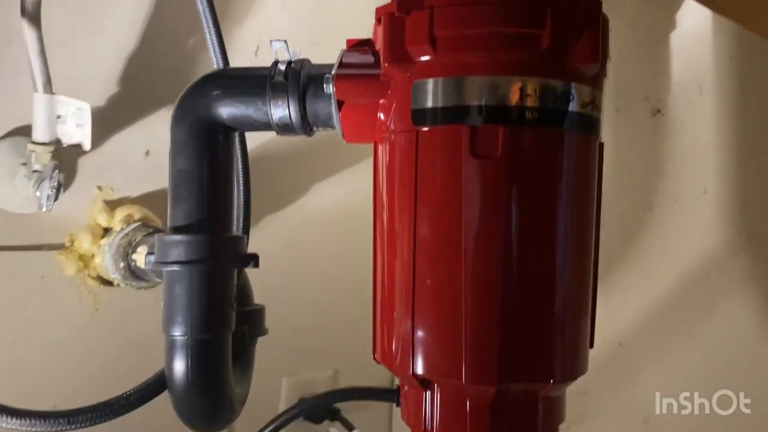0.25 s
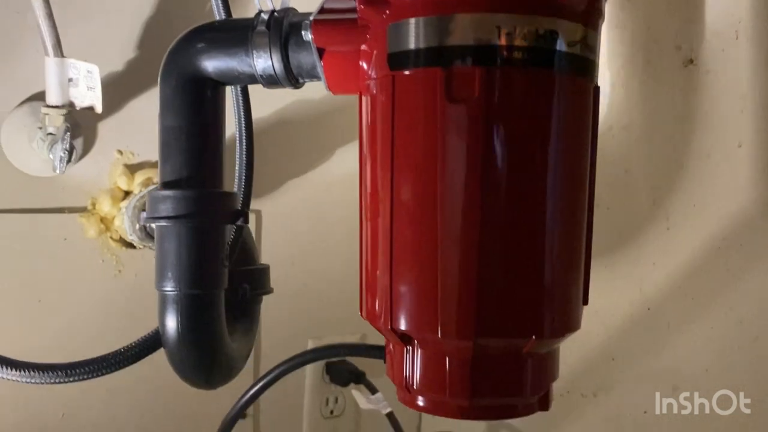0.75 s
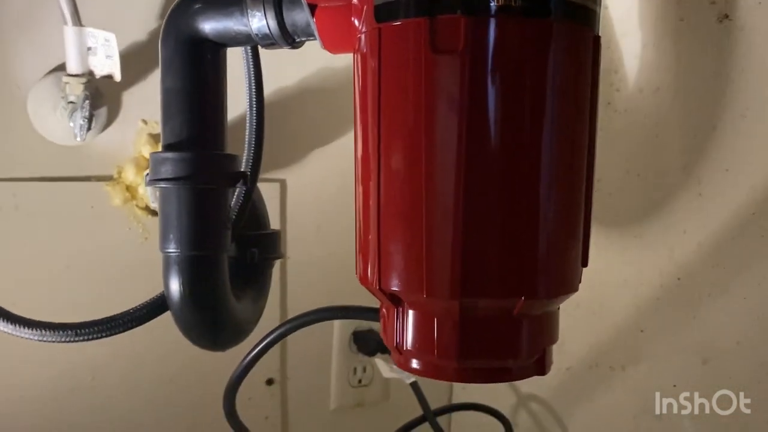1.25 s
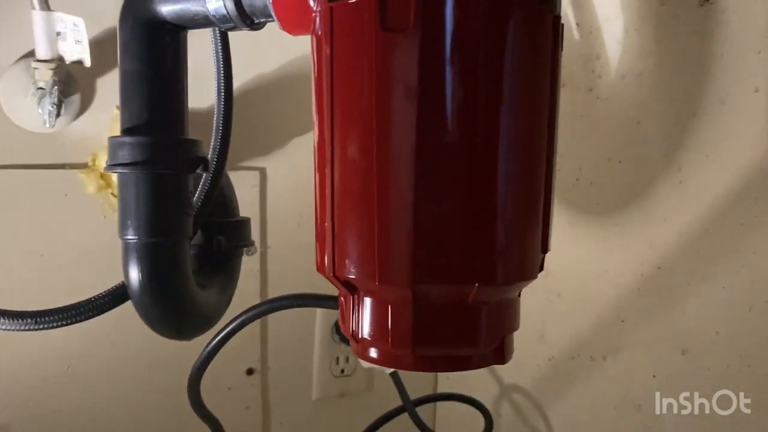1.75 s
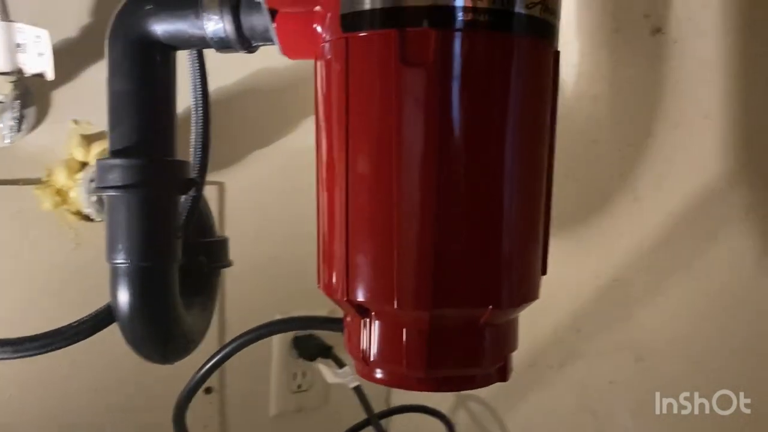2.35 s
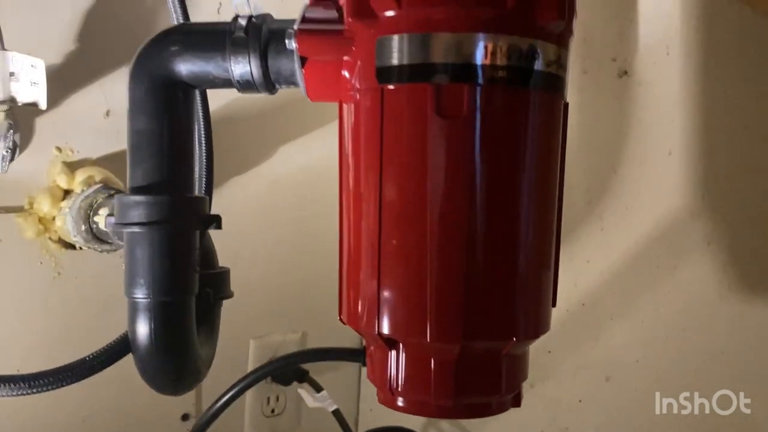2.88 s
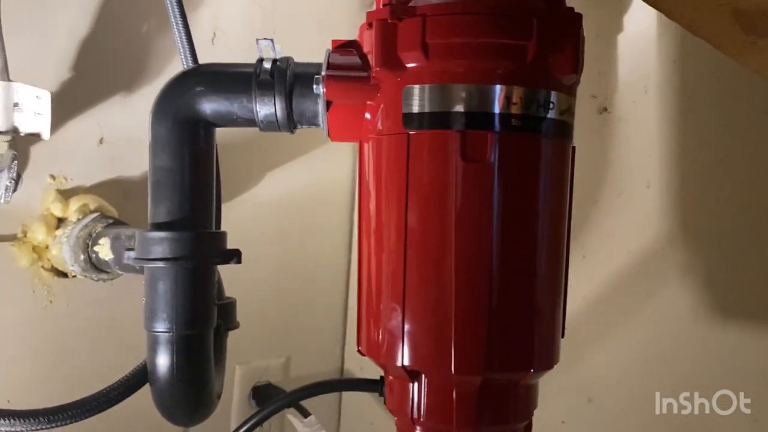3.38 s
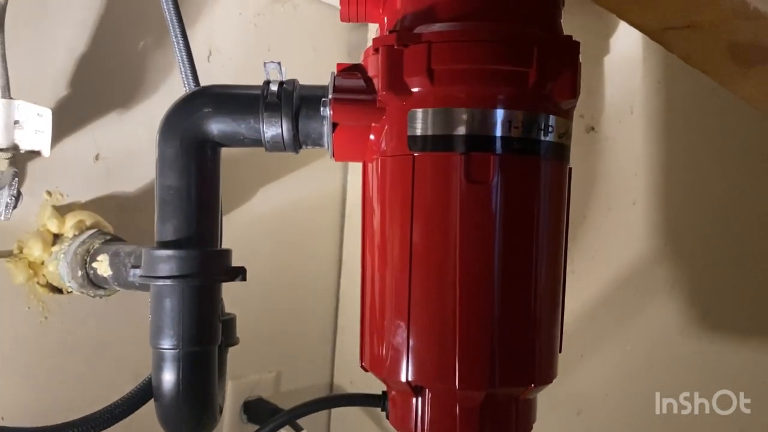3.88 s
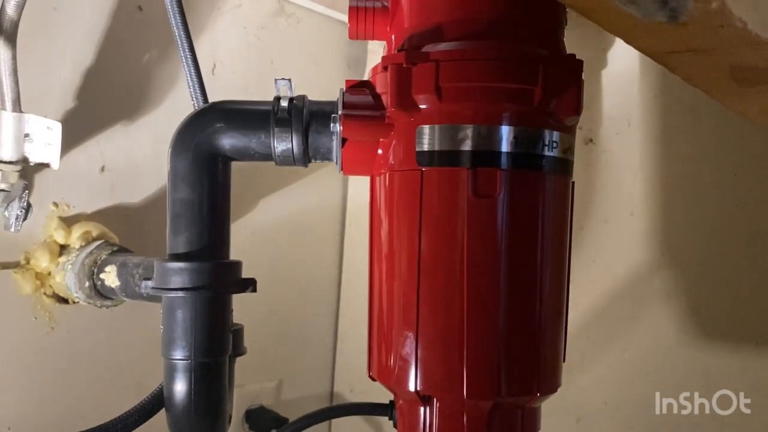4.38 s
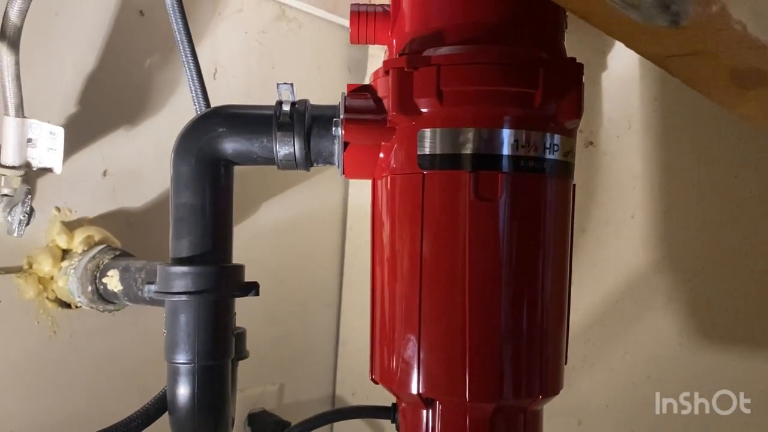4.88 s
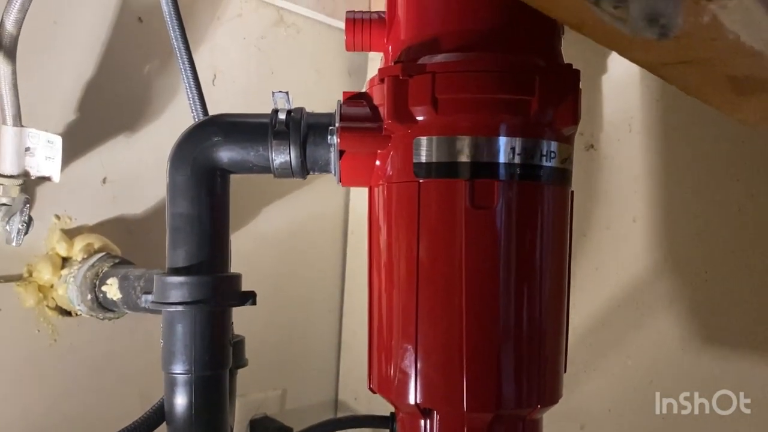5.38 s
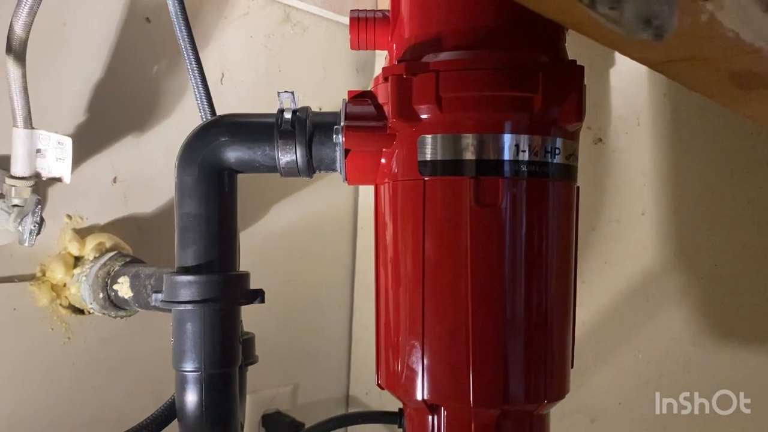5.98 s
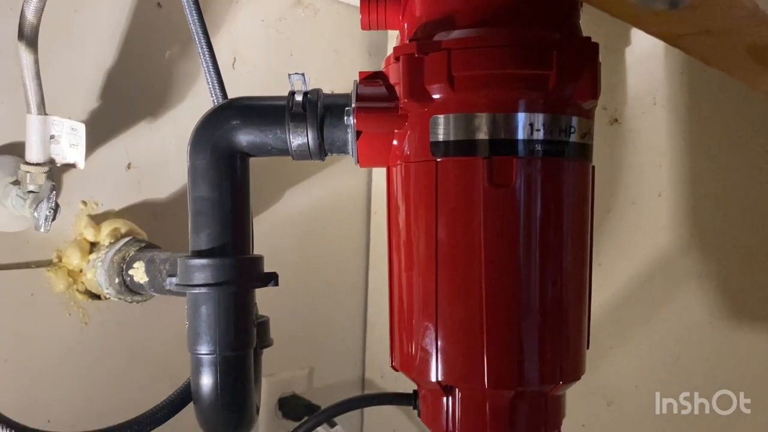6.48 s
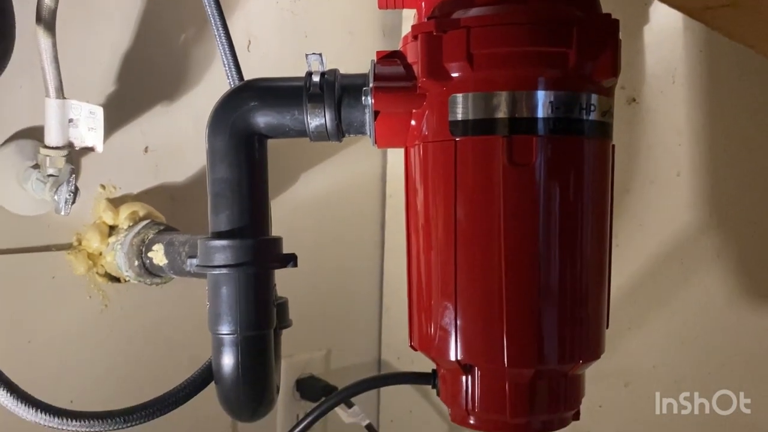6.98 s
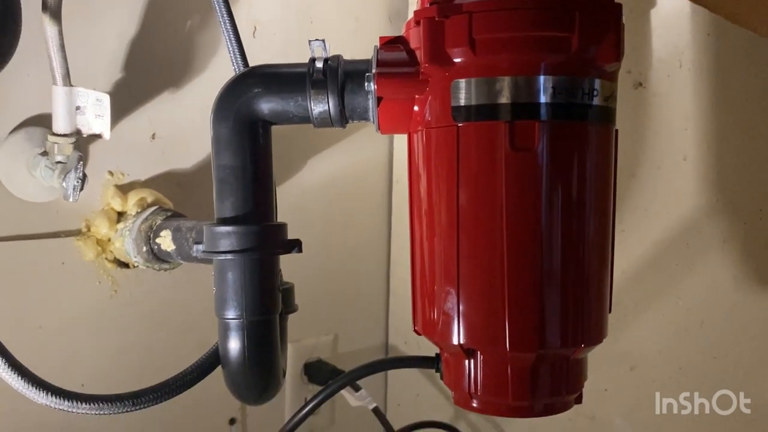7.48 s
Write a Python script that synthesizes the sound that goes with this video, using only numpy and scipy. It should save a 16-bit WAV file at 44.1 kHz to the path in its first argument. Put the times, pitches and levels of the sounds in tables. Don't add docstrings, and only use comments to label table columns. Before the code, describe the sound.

Close inside a kitchen sink cabinet, a waste grinder is already running at 0 s and continues unbroken to about 7.7 s, with nothing solid being ground. A low hum near 120 Hz beats several times a second against the shaft tone, under a stack of buzzing mid tones and a thin commutator whine around 750 and 1500 Hz. Brushes scrape in a dry, fast rasp. Water hisses broadly, churns and rings in the steel chamber, and gurgles in the trap, notably around 0.6 and 2 s. The whine is damped near 0.3 s, freer and brighter near 1.2 s, and duller again at 3 s. Soft low water thumps come irregularly, stronger near 2.5, 4.1, 5.2, 5.9 and 6.5 s. The hand-held stereo microphones wander, making tones swell and fade, with short boxy reflections and slightly muted extreme treble.

```python
import sys
import numpy as np
from scipy import signal
from scipy.fft import rfft, irfft, next_fast_len
from scipy.io import wavfile

SR = 44100
rng = np.random.default_rng(int(sys.argv[2]) if len(sys.argv) > 2 else 0)


def pcm_store(signal):
    levels = np.round(np.clip(np.atleast_2d(signal), -1, 1) * 32767)
    wavfile.write(sys.argv[1], SR, levels.astype(np.int16).T)


def nominal_scale(level):
    x = np.asarray(level, float) / 20
    return 10 ** x


N = 341334
FFT_SIZE = next_fast_len(N)
HZ = np.maximum(np.fft.rfftfreq(FFT_SIZE, 1 / SR), 1)
STEP = 64
SLOW_S = np.arange(N // STEP + 2) * STEP / SR
RIPPLE_HZ = 119.92

# (time [s], sideways [-1..1], depth [-1..1], height [-1..1])
HAND_PATH = [(0.0, 0.28, 0.68, -1.0), (0.5, 0.54, 0.19, -0.61), (1.0, 0.51, -0.51, -0.42),
             (1.5, 0.51, -0.63, 0.26), (2.0, 0.41, -0.99, 0.55), (2.5, 0.15, -0.06, 0.42),
             (3.0, 0.14, 0.64, -0.19), (3.5, 0.043, 0.4, 0.3), (4.0, -0.097, 0.32, 0.71),
             (4.5, -0.014, 0.56, 0.23), (5.0, -0.73, -0.031, 0.2), (5.5, -0.44, -0.5, -0.77),
             (6.0, -0.79, -0.83, -0.27), (6.5, -0.63, -1, -0.2), (7.0, -0.41, -0.56, -0.15),
             (7.74, -0.6, -0.71, 0.76)]


def rms_one(x):
    return x / np.sqrt(np.mean(x ** 2) + 1e-20)


def in_time(rows):
    s, *columns = np.transpose(rows)
    return [np.interp(SLOW_S, s, c) for c in columns]


def full(slow):
    return np.interp(np.arange(N) / SR, SLOW_S, slow)


def at_hz(points, hz, axis=1):
    points = np.array(points)
    return np.interp(np.log(hz), np.log(points[:, 0]), points[:, axis])


def filtered(x, gain):
    return irfft(rfft(x, FFT_SIZE) * gain, FFT_SIZE)[:, :N]


def drift(rate):
    r = np.exp(-2 * np.pi * rate * STEP / SR)
    noise = rng.standard_normal(len(SLOW_S) + 2000)
    slow = signal.lfilter([1], [1, -2 * r, r * r], noise)[2000:]
    return rms_one(slow - slow.mean())


def resonate(x, modes):
    out = 0
    for hz, width, level_db in modes:
        r = np.exp(-np.pi * width / SR)
        b, a = [1, 0, -1], [1, -2 * r * np.cos(2 * np.pi * hz / SR), r * r]
        rung = signal.lfilter(b, a, signal.lfilter(b, a, x))
        out = out + nominal_scale(level_db) * rms_one(rung)
    return rms_one(out)


def rotation():
    # (time [s], speed [turns per s])
    spin = [(0.0, 62.503), (0.5, 62.57), (0.9, 62.618), (1.2, 62.737), (1.6, 62.688), (1.9, 62.547),
            (2.3, 62.589), (2.8, 62.643), (3.3, 62.605), (3.7, 62.501), (4.2, 62.611), (4.7, 62.281),
            (5.2, 62.396), (5.8, 62.463), (6.2, 62.459), (6.6, 62.533), (7.2, 62.482), (7.74, 62.447)]
    shaft = 0.128 + np.cumsum(full(in_time(spin)[0])) / SR
    ripple = -0.455 + RIPPLE_HZ * np.arange(N) / SR
    return shaft, ripple


def tone(turns, level_db, pan_db, lead):
    size = np.sqrt(2) * full(nominal_scale(level_db))
    sides = []
    for sign in (.5, -.5):
        angle = np.float32(2 * np.pi * (turns % 1) + sign * lead)
        sides.append(nominal_scale(sign * pan_db) * size * np.cos(angle))
    return np.array(sides)


def hum(shaft, ripple):
    # (time [s], mains hum [dB], second shaft order [dB])
    throb = [(0, -26, -33.5), (2, -25.5, -34), (4, -25.5, -32), (6, -25.5, -31.5), (7.74, -25.5, -33)]
    hum_db, second_db = in_time(throb)
    mains = tone(ripple, hum_db + .3 * drift(1.5), 2.3, .2)
    second = tone(2 * shaft, second_db + .5 * drift(1.5), 3.0, .4)
    return mains + second


def whine(shaft, ripple):
    # (shaft multiple, level [dB rms], then change [dB] per sideways, per depth, per height)
    shaft_orders = [(1, -46.1, -5.2, -1.0, 0.0), (3, -58.5, 4.1, 0.8, 0.1), (4, -40.8, 2.1, 2.1, 5.0),
                    (5, -43.1, -11.4, 2.5, -0.4), (6, -43.1, -4.7, 4.5, -1.0), (7, -50.7, -5.6, 3.6, 3.0),
                    (8, -45.3, 0.1, 2.1, -2.7), (9, -54.7, -4.8, 3.6, -0.0), (10, -50.9, 3.9, 4.2, -1.8),
                    (12, -54.3, -0.2, 1.6, -2.4), (14, -57.1, -1.9, -0.7, -0.3), (17, -55.2, 0.6, 0.1, 0.5),
                    (24, -37.9, 0.2, -1.2, 1.3), (28, -50.1, 4.3, -3.9, -0.1), (29, -53.8, -4.7, 1.1, 1.6),
                    (31, -54.7, 5.9, -2.0, 0.2), (32, -54.9, 1.6, -1.0, 0.9), (33, -57.9, -5.3, 3.7, -2.7),
                    (36, -46.3, 7.0, -1.5, 2.1), (48, -47.4, -2.5, -2.5, 2.8), (60, -55.5, -4.8, 2.1, -2.7),
                    (72, -58.5, 2.1, -1.9, 1.1), (96, -55.2, -1.0, -3.4, 2.5),
                    (120, -65.8, 0.8, -2.7, -2.4)]
    # (shaft multiple, ripple multiple, level [dB rms], change [dB] per sideways, per depth)
    side_tones = [(-2, 2, -52.7, -2.0, 5.4), (0, 3, -51.2, 2.7, -0.3), (2, 2, -50.1, 1.9, 5.1),
                  (4, 1, -46.6, 1.8, 5.2), (0, 6, -54.3, 2.2, -2.5), (12, 2, -53.0, -2.4, 0.0),
                  (24, -1, -55.3, 0.3, 2.7), (24, 1, -41.6, 2.8, -0.6), (24, 2, -51.5, 5.0, 0.5),
                  (0, 14, -58.9, 2.4, 0.5), (36, 1, -59.5, 0.0, 1.3), (60, -1, -61.0, 7.5, 0.0)]
    # (frequency [Hz], left minus right [dB], left lead [rad])
    tone_side = [(62, -.4, .3), (250, -1.1, 0), (312, 6.1, -.1), (500, 6.2, .7), (1050, 5, 0),
                 (1500, 2, .3), (1620, 1.3, -1.1), (3000, -.5, 1.2)]
    # (time [s], half width [s], level at the 48th shaft order
    # [dB])
    hushes = [
        (.3, .3, -6.5),
        (1.15, 0.34, 3),
        (2.45, 0.15, 1.5),
        (3.05, 0.23, -4.5),
    ]
    whine_step = 12

    hush_db = sum(db * np.exp(-((SLOW_S - s) / width) ** 2) for s, width, db in hushes)
    sideways, depth, height = in_time(HAND_PATH)
    shiver = shaft + 0.0009 * full(drift(18.0))
    rows = [(k, 0, *rest) for k, *rest in shaft_orders]
    rows += [(*row, 0) for row in side_tones]
    out = np.zeros((2, N))
    for k, m, level_db, sideways_db, depth_db, height_db in rows:
        hz = k * 62.503 + m * RIPPLE_HZ
        swell_db = sideways_db * sideways + depth_db * depth + height_db * height + 1.4 * drift(0.28)
        if k > whine_step and k % whine_step == 0:
            swell_db = swell_db + hush_db * np.log2(k / whine_step) / 2
        turns = k * shiver + m * ripple + rng.random()
        tone_db = level_db + 0.13 + swell_db + 0.5 * drift(15.0)
        out += tone(turns, tone_db, at_hz(tone_side, hz), at_hz(tone_side, hz, axis=2))
    return out


def brushes(shaft, ripple):
    size, out = 720, 0
    for track in rng.standard_normal((3, 2, size)):
        seen = [np.interp(shaft % 1 * size, np.arange(size), side, period=size) for side in track]
        out = out + np.array(seen) * full(nominal_scale(3.1 * drift(0.96)))
    scrape = rms_one(out * (1 + 0.39 * np.cos(2 * np.pi * ripple)))
    return signal.sosfilt(signal.butter(4, 2400, "high", fs=SR, output="sos"), scrape)


def churn(scrape):
    # (frequency [Hz], level [dB per Hz])
    rumble = [(25, -67), (40, -77), (60, -61.5), (85, -55.5), (102, -57.5), (145, -59.5), (190, -71),
              (225, -63.5), (270, -57.5), (330, -63.5), (450, -58.5), (600, -60.5), (800, -66), (1000, -64)]
    # (frequency [Hz], level [dB per Hz])
    spray = [(1000, -67.5), (1400, -69.5), (1900, -66.5), (2500, -68.5), (3300, -66), (4500, -68),
             (5000, -71.5), (5800, -72.5), (6600, -74.5), (8000, -74), (10000, -76.5), (12500, -80),
             (15000, -78.5), (15800, -82)]
    # (frequency [Hz], change per sideways [dB], per depth [dB])
    shade = [(150, -0.5, -0.5), (210, -8, 3), (290, 6, -5.5), (420, -4, 3.5), (600, 4, -1), (850, 0.5, 0),
             (990, -6, 3.5), (1400, 1, 2.7), (1900, 2, -2.5), (2600, 0.5, 0.4), (3400, 2, 1),
             (4400, 3.5, -0.9), (5470, 0.3, 0.2), (8000, 0.6, 0.05)]
    white = rfft(rng.standard_normal((2, N)) + nominal_scale(-10.5) * scrape, FFT_SIZE)
    level_db = np.where(HZ < 1000, at_hz(rumble, HZ), at_hz(spray, HZ))
    colored = white * np.sqrt(SR / 2) * nominal_scale(level_db)
    out, together, octaves = 0, drift(11.0), np.log2(HZ / 30)
    sideways, depth, _ = in_time(HAND_PATH)
    for step in range(19):
        hz = 30 * 2 ** (step / 2)
        window = np.maximum(1 - abs(2 * octaves - step), 0)
        band = irfft(colored * window, FFT_SIZE)[:, :N]
        shade_db = at_hz(shade, hz) * sideways + at_hz(shade, hz, axis=2) * depth
        flicker_db = .3 * together + .5 * drift(28.0)
        tilt_db = -step / 18
        out = out + band * full(nominal_scale(shade_db + flicker_db + tilt_db))
    return out


def slugs():
    # (time [s], panels [dB], trap [dB], steel can [dB])
    hits = [(.37, 1, 4, 0.5), (.62, 3, 10.5, 2), (1.17, -1, -5, 1), (1.48, 1, 4, -1.5), (1.98, 5, 8, -2.5),
            (2.24, 6, 4, 0), (2.5, 13, -2, 0.5), (2.78, 9, 0, 2), (2.93, 1, -12, 2.5), (3.62, 4, 2, 2),
            (3.88, 2, 4.5, 2.5), (4.05, 9, -1, 1), (4.28, 8, 5, 0.5), (4.6, 7, 1, 1), (5.2, 11, -1, -0.5),
            (5.36, -4, -1, 2), (5.86, 13, 4, 4), (6.45, 10, 3.5, 3), (7.39, 3, -8, 1), (7.65, 6, 5, -1.5)]
    # panels, trap, can [dB]
    calm = [-44, -43.5, -35]
    rise_s, fall_s = [0.06, 0.052, 0.064], [0.066, 0.066, .1]
    s, *lifts = np.transpose(hits)
    since = SLOW_S - s[:, None]
    levels = []
    for calm_db, lift_db, rise, fall in zip(calm, lifts, rise_s, fall_s):
        bump = np.exp(-(since / np.where(since < 0, rise, fall)) ** 2)
        levels.append(calm_db + lift_db @ bump)
    return levels


def gurgle():
    # (frequency [Hz], width [Hz], level [dB])
    trap = [(270.3, 21, -2.5), (286, 19, -11.5), (357.4, 40, 4), (460.6, 19, -7), (519, 34, -2),
            (657, 21, -3)]
    out = 0
    for hz, width, level_db in trap:
        sizes = rng.standard_normal((2, N)) * nominal_scale(2.5 * np.minimum(rng.exponential(1, N), 3))
        per_second = 110.0 * full(nominal_scale(2.5 * drift(9.0)))
        bubbles = sizes * (rng.random(N) < per_second / SR) + 1e-18
        out = out + nominal_scale(level_db) * resonate(bubbles, [(hz, width, 0)])
    return rms_one(out)


def water():
    # (frequency [Hz], width [Hz], level [dB])
    panels = [(58.4, 13, 1.5), (82.2, 19, 0)]
    # (frequency [Hz], width [Hz], level [dB])
    can = [(1136.6, 45, -5), (1182.7, 71, 3), (1224, 69, 0), (1283, 28.5, -1), (1422, 51, -5),
           (1644, 46, -14), (2866, 106, -10), (3377, 56, -12)]
    thump_db, gurgle_db, ring_db = slugs()
    sideways, depth, _ = in_time(HAND_PATH)
    ring_db = ring_db + 0.5 * sideways + 1.4 * depth
    surges = rng.standard_normal((2, N)) * full(nominal_scale(2.8 * drift(5.0)))
    splashes = rng.standard_normal((2, N)) * full(nominal_scale(1.4 * drift(14.0)))
    thumps = full(nominal_scale(thump_db - 3.0)) * resonate(surges, panels)
    gurgles = full(nominal_scale(gurgle_db + 4.0)) * gurgle()
    ringing = full(nominal_scale(ring_db + 0.16)) * resonate(splashes, can)
    return thumps + gurgles + ringing


def cabinet(x):
    t60_s, echo_db = .07, -7.0
    spots, sideways = np.linspace(-1, 1, 5), in_time(HAND_PATH)[0]
    tail = nominal_scale(-60 * np.arange(3000) / SR / t60_s)
    high = signal.butter(2, [1800, 6500], "band", fs=SR, output="sos")
    echoes = 0
    for spot, grains in zip(spots, rng.standard_normal((5, 2, 3000))):
        answer = signal.sosfilt(high, grains * tail) / np.sqrt(np.sum(tail ** 2))
        near = np.sqrt(np.maximum(1 - 2 * abs(sideways - spot), 0))
        echoes = echoes + signal.oaconvolve(x, answer, axes=1)[:, :N] * full(near)
    return x + nominal_scale(echo_db) * echoes


def standing_waves():
    # (frequency [Hz], width [Hz], level [dB], sideways of spot [-1..1], depth of spot [-1..1])
    air_modes = [(2224, 66, -46.5, .5, -0.64), (2750, 88, -44, 0.54, 0.12), (3010, 50, -45, .25, -.45),
                 (3376, 50, -46.5, -.02, 0.46), (4300, 90, -51, .4, .4), (4510, 180, -48.5, -0.56, -0.45),
                 (4490, 180, -49, -.1, .4), (6020, 100, -49, .5, -0.68), (6030, 90, -55, -.6, -.6)]
    reach = 0.47
    sideways, depth, _ = in_time(HAND_PATH)
    white, out = rng.standard_normal((2, N)), 0
    for hz, width, level_db, spot_sideways, spot_depth in air_modes:
        distance_squared = (sideways - spot_sideways) ** 2 + (depth - spot_depth) ** 2
        near = np.exp(-distance_squared / reach ** 2)
        level = near * nominal_scale(level_db + 1.5 * drift(4.0))
        out = out + resonate(white, [(hz, width, 0)]) * full(level)
    return out


def pair(two):
    # (frequency [Hz], left minus right [dB], likeness [0-1])
    balance = [(40, 1.4, .93), (90, 2.8, .96), (190, 3, .5), (260, .5, .92), (350, 2.9, .87),
               (600, 4.6, .5), (850, 5.6, .6), (1200, 3.9, .72), (1800, 1.4, .4), (2600, 1.5, .55),
               (4400, 1, .58), (5400, .4, .12), (6500, .3, .8), (8000, 0, .97)]
    # (frequency [Hz], left lead [rad])
    left_lead = [(0, .2), (500, .5), (1500, 0), (2000, -.6), (3100, 1.0), (4500, .2), (6700, 0),
                 (8990, -np.pi), (11170, -2 * np.pi), (13260, -3 * np.pi), (15480, -4 * np.pi),
                 (22050, -7 * np.pi)]
    direct, scattered = rfft(two, FFT_SIZE)
    alike = np.clip(at_hz(balance, HZ, axis=2), 0, 1)
    lag = np.exp(-1j * np.interp(HZ, *np.transpose(left_lead)))
    half = nominal_scale(at_hz(balance, HZ) / 2)
    right = alike * lag * direct + np.sqrt(1 - alike ** 2) * scattered
    return irfft(np.array([direct * half, right / half]), FFT_SIZE)[:, :N]


def turned(x):
    # (frequency [Hz], left minus right per sideways [dB])
    tip = [(100, -1.5), (400, 0), (1200, -3), (4000, -4), (6000, -1), (7000, 0.5)]
    slope = filtered(x, at_hz(tip, HZ))
    db_to_gain = np.log(10) / 40
    return x + slope * full(in_time(HAND_PATH)[0]) * db_to_gain * [[1], [-1]]


def scene():
    shaft, ripple = rotation()
    tones = hum(shaft, ripple) + whine(shaft, ripple)
    noise = nominal_scale(-2.0) * churn(brushes(shaft, ripple)) + water()
    return turned(tones + pair(cabinet(noise) + standing_waves()))


def roll_off(x):
    return signal.sosfilt(signal.butter(12, 15890, fs=SR, output="sos"), x)


def record(dry):
    mix = filtered(dry, HZ < 15740)
    return roll_off(mix)


dry = scene()
out = record(dry)
pcm_store(out)
```